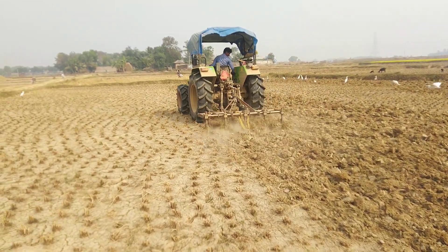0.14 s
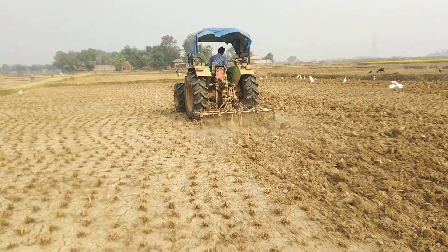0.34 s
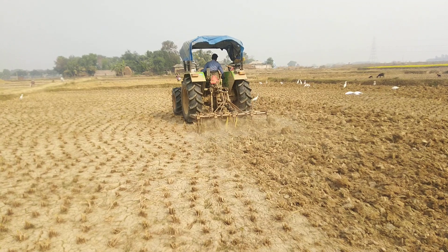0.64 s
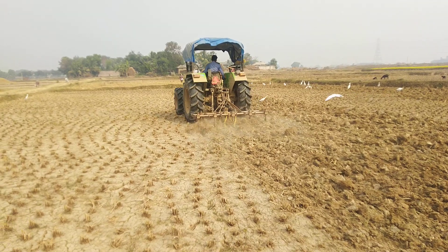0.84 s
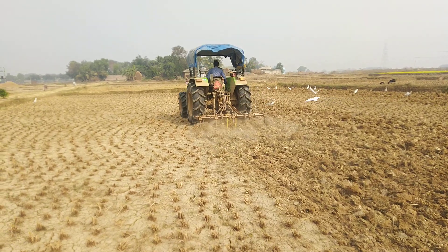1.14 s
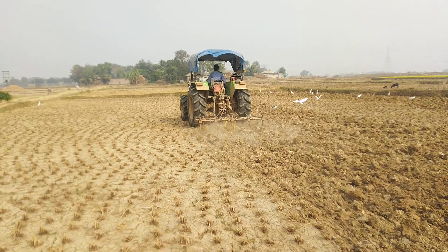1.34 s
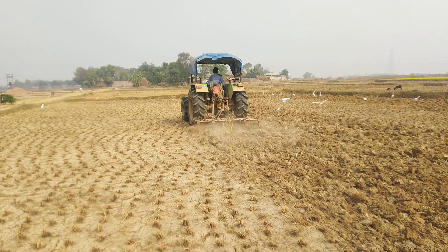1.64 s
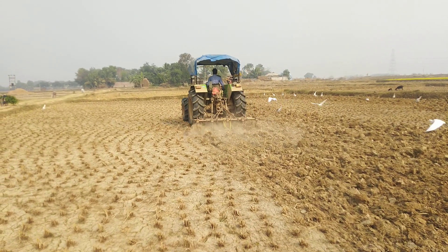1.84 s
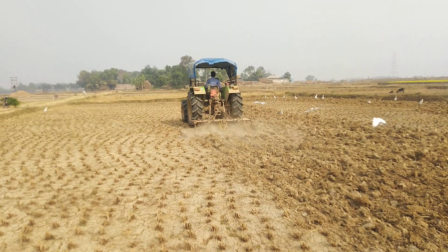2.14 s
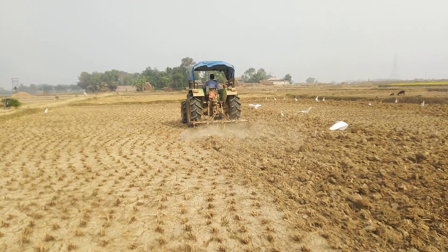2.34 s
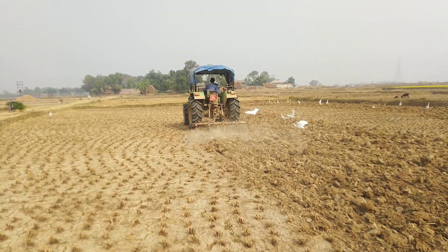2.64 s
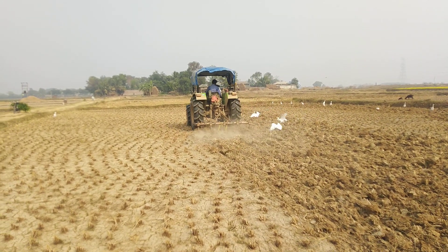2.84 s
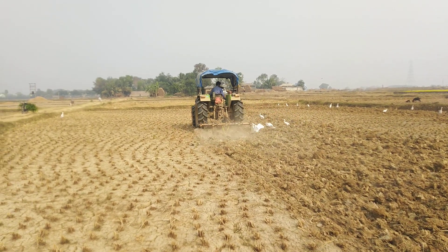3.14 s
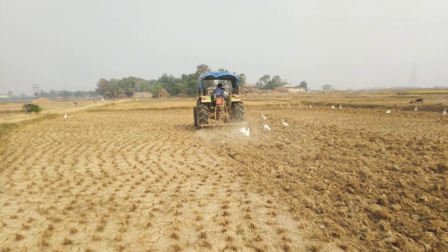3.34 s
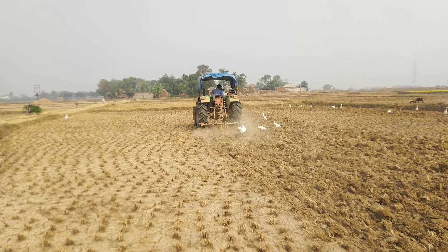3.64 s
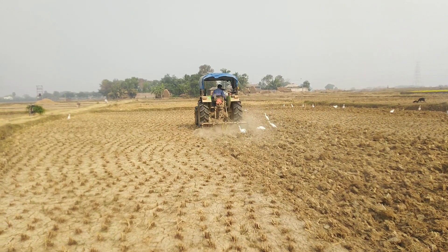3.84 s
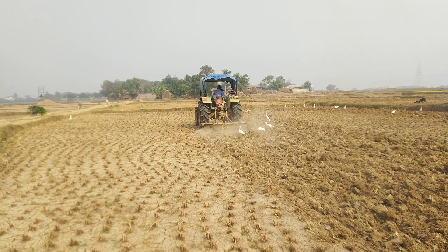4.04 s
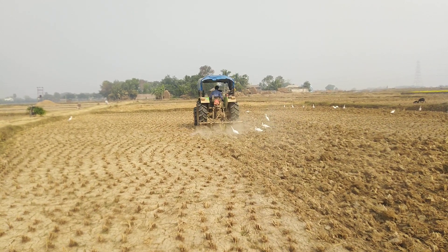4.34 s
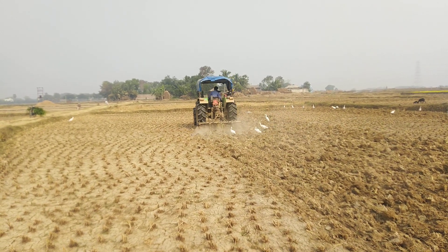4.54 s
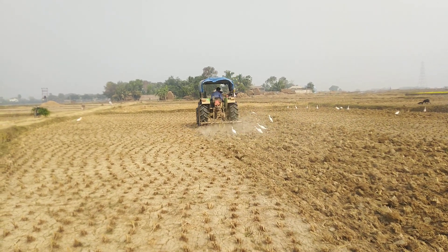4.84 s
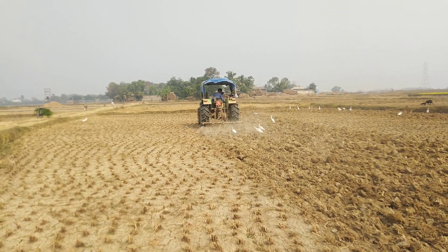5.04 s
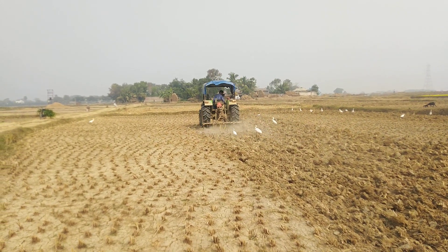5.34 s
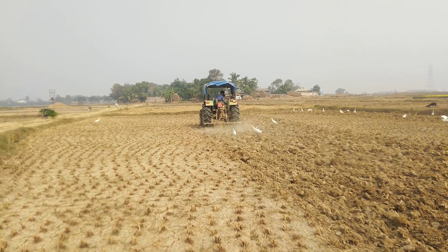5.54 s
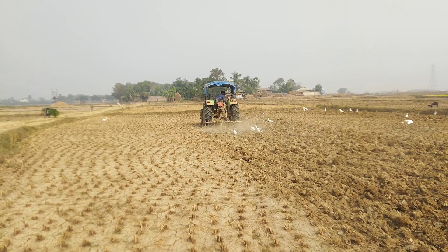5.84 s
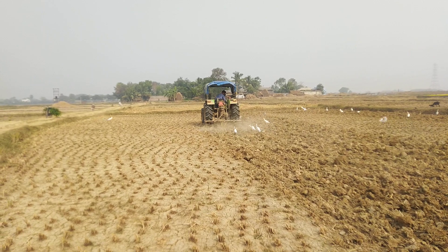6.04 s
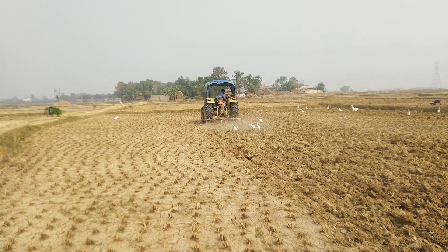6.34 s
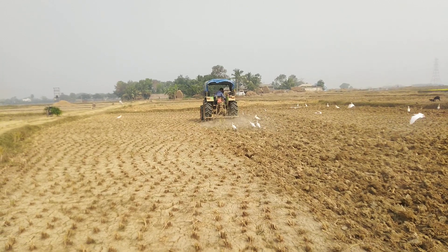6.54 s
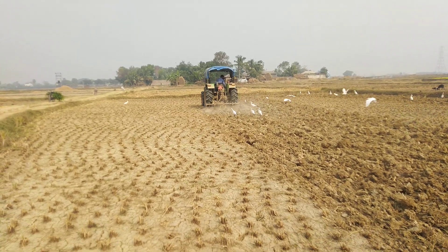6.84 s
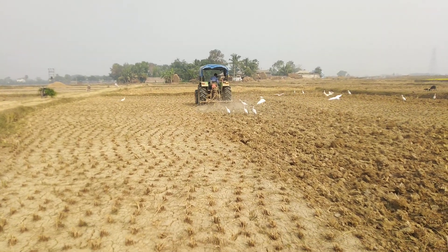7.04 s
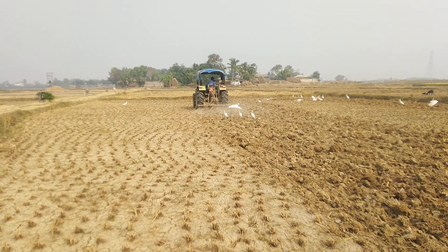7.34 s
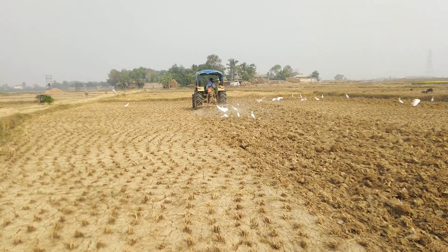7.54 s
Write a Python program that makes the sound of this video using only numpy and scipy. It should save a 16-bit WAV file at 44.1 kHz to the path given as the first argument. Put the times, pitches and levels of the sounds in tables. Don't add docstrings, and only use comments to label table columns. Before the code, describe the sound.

Rough wind thuds and crackles over a hand-held microphone as a knocking, whining tractor engine recedes under load, with small bird whistles and handling taps.

```python
import sys
import numpy as np
from scipy import signal
from scipy.fft import rfft, irfft
from scipy.io import wavfile
from scipy.ndimage import uniform_filter1d

SR = 44100
rng = np.random.default_rng(int(sys.argv[2]) if len(sys.argv) > 2 else 0)


def attenuation_scalar(level_db):
    decades = np.asarray(level_db, float) / 20
    return 10 ** decades


def to_wav(s):
    ch = np.atleast_2d(s).T
    pcm = np.round(np.clip(ch, -1, 1) * 32767)
    wavfile.write(sys.argv[1], SR, pcm.astype(np.int16))


N = 338688
T = np.arange(N) / SR


def curves(table):
    s, *columns = np.transpose(table)
    return [np.interp(T, s, column) for column in columns]


def unit(x):
    return x / np.sqrt(np.mean(x ** 2))


def noise():
    return rng.standard_normal(N)


def colour(x, points):
    hz, db = np.transpose(points)
    f = np.log(np.arange(N // 2 + 1) * SR / N + 1)
    return unit(irfft(rfft(x) * attenuation_scalar(np.interp(f, np.log(hz), db, -130, -130)), N))


def walk(rate):
    k = int(SR / rate)
    steps = np.repeat(rng.standard_normal(N // k + 1), k)
    return unit(uniform_filter1d(uniform_filter1d(steps, k), k)[:N])


def add(out, s, grain):
    i = int(s * SR)
    out[i:i + len(grain)] += grain[:N - i]


def distance_db():
    start_m, away_m_s = 11.65, 2.28
    return -20 * np.log10(1 + away_m_s * T / start_m)


# f/Hz, level/dB (per Hz)
AIR_SPECTRUM = [(6000, -5), (7300, -13.5), (8100, -18), (9200, -5), (11500, -3), (13200, -6.5),
                (14200, -14.5), (15200, -27)]


def air_hiss():
    def port():
        level_db = -64 + 1.08 * distance_db() + 0.8 * walk(12) + 2.0 * walk(40)
        return colour(noise(), AIR_SPECTRUM) * attenuation_scalar(level_db)
    return np.array([port() for _ in range(2)])


# f/Hz, level/dB
RIGHT_SHADE = [(1600, -0.5), (2050, 1), (2300, 3.5), (2700, 4), (3100, -3.5), (3500, 0.5), (3850, -13),
               (4100, -3.5), (4900, -9.5), (5500, 3.5), (6200, -6), (7000, 2.5)]


def shade(x):
    hz, db = np.transpose(RIGHT_SHADE)
    return irfft(rfft(x) * attenuation_scalar(np.interp(np.arange(N // 2 + 1) * SR / N, hz, db)), N)


CLATTER_DB = -40.5
# f/Hz, level/dB (per Hz)
CLATTER_SPECTRUM = [(1500, -5.5), (1900, -4), (2800, -4), (3600, -6), (4400, -9.5), (5600, -18),
                    (6500, -27), (8000, -39)]
# t/s, extra body echo delay/ms, right port level/dB, tinwork shading level/dB
TURN = [
    (0, 0.012, 1, -0.5),
    (1.3, 0.0058, 2.5, -1),
    (6.8, 0.0023, 1.5, 0),
    (7.0, 0.018, 1, -1.5),
    (7.68, 0.036, 0.5, -3),
]


def furrow_scatter():
    shade_db = curves(TURN)[2]
    loose = np.array([colour(noise(), CLATTER_SPECTRUM) for _ in range(2)])
    loose *= attenuation_scalar(CLATTER_DB - 9 + shade_db + distance_db())
    loose[1] = shade(loose[1])
    return loose


# t/s, length/s, buffeting level/dB, thud share level/dB
GUSTS = [(0.278, 0.076, -56, -5.2), (0.576, 0.044, -26, -16), (0.685, 0.006, -22, -5),
         (0.824, 0.13, -27.5, -1), (1.151, 0.067, -24.5, 0), (1.264, 0.08, -23, -9),
         (1.506, 0.04, -25.5, -8), (1.62, 0.22, -25.5, 0), (1.922, 0.065, -14.5, -28),
         (2.161, 0.0074, -23, -9), (2.246, 0.21, -33.5, -13), (2.697, 0.019, -19, -33),
         (2.804, 0.13, -23.5, -33), (2.962, 0.23, -20.5, -4.5), (3.552, 0.17, -18, -18),
         (3.832, 0.45, -20.5, -12), (4.3, 0.17, -34, -2), (4.56, 0.0087, -37, 6), (4.641, 0.007, -17.5, -9),
         (4.781, 0.017, -21.5, -5), (4.867, 0.37, -31.5, 0), (5.336, 0.1, -24.5, 0),
         (5.462, 0.27, -22.5, -5), (5.83, 0.3, -39.5, 7.5), (6.172, 0.025, -25, -9),
         (6.295, 0.12, -23.5, -3), (6.478, 0.1, -21, 0.5), (6.636, 0.098, -29.5, -17),
         (6.799, 0.21, -48, 11.5), (7.208, 0.078, -51, 24), (7.413, 0.2, -31.5, -4)]


def gusts():
    rise_s, fall_s, calm_db, calm_thud_db = 0.014, 0.028, -34, -6
    body = np.full(N, attenuation_scalar(calm_db))
    thud = np.full(N, attenuation_scalar(calm_db + calm_thud_db))
    for s, length, db, thud_db in GUSTS:
        before, after = np.clip(s - T, 0, None), np.clip(T - s - length, 0, None)
        shape = np.exp(-before / rise_s - after / fall_s)
        body += attenuation_scalar(db) * shape
        thud += attenuation_scalar(db + thud_db) * shape
    return body, thud


# t/s, peak level/dB, width/ms
SNAPS = [(0.6864, -8.5, 3.1), (0.9025, -13.5, 1.6), (1.173, -13, 3.5), (1.189, -9, 3.1),
         (1.203, -16.5, 3.3), (1.9593, -7.5, 3), (1.9746, -16, 2.4), (1.9921, -11.5, 1),
         (2.1662, -5.5, 3.3), (2.7303, -23, 2.5), (2.961, -14, 4.5), (3.004, -12, 4), (3.03, -6, 3.2),
         (3.046, -12, 2.6), (3.0685, -16, 4.7), (3.1054, -11.5, 2.2), (3.117, -9, 7.1),
         (3.1599, -13.5, 3.3), (3.1983, -11.5, 2), (3.5596, -8, 0.91), (3.5971, -5.5, 0.93),
         (3.6316, -7, 1.8), (3.66, -16, 1.9), (3.6784, -14, 2.5), (3.739, -4.5, 1.7), (3.8478, -8, 1.1),
         (3.8669, -8.5, 0.97), (3.9064, -10.5, 1.63), (3.9604, -9, 3.3), (3.971, -5, 6.7),
         (3.984, -12, 3.06), (4.013, -4.5, 2.8), (4.0545, -5.5, 1.9), (4.093, -11, 2), (4.1156, -14.5, 2.1),
         (4.1292, -15, 1.3), (4.1972, -7, 1.1), (4.249, -6.5, 1.2), (4.262, -13, 1.7), (4.5765, -11, 4.2),
         (4.773, -8, 6.7), (4.784, -20.5, 0.4), (4.9449, -10, 5.5), (5.347, -14, 6), (5.3907, -11, 4.3),
         (5.4084, -8.5, 3.3), (5.464, -14, 1.5), (5.5043, -17, 2.3), (5.5799, -9, 3.2), (5.637, -10, 2.4),
         (5.6782, -14, 1.5), (6.1938, -8, 4), (6.234, -12, 1.5), (6.3935, -15.5, 1.8), (6.5114, -5, 3.8),
         (6.551, -12.5, 2.3), (6.5756, -12.5, 1.3), (6.69, -11.5, 1.9), (6.7445, -14.5, 1.4),
         (7.502, -12.5, 1.7)]
# t/s, peak level/dB, width/ms
PUFFS = [(0.681, -15, 3), (3.156, -7.5, 4.3), (3.193, -14.5, 2), (3.579, -10, 2.1), (3.675, -13, 2),
         (3.698, -15, 1.9), (3.759, -14.5, 1.8), (3.89, -14.5, 1.9), (4.154, -12, 1.8), (4.2129, -7.5, 1.3),
         (4.231, -15, 2.2), (4.2904, -16.5, 1.6), (4.333, -14.5, 1), (4.6376, -17, 1.46), (4.663, -16, 2.7),
         (4.683, -16, 2.6), (5.342, -9.5, 4.6), (5.383, -12, 2.9), (5.475, -12.5, 2), (6.411, -11, 2.9),
         (6.526, -14, 3.1)]


def snaps():
    back_s, hush_s, hush = 0.0033, 0.0043, 0.7
    out, hushed = np.zeros(N), np.zeros(N)
    t = np.arange(-600, 6000) / SR
    for sign, table in (-1, SNAPS), (1, PUFFS):
        for s, db, ms in table:
            jump_s = 0.24 * ms / 1000
            jump = (1 + np.tanh(t / jump_s + 1.22)) / 2
            creep = np.exp(-np.clip(t, 0, 1) / back_s)
            add(out, s + t[0], sign * attenuation_scalar(db + 3.5) * jump * creep)
            add(hushed, s + t[0], np.exp(-(t / hush_s) ** 2))
    return out, 1 - np.clip(hush * hushed, 0, 1)


def eddies(rate, spread_db):
    kick = rng.random(N) < rate / SR
    return kick * noise() * attenuation_scalar(spread_db * noise())


# f/Hz, level/dB
THUD_SPECTRUM = [(20, -5.5), (52, -6.5), (72, -0.5), (90, -0.5), (130, -34.5)]
BODY_SPECTRUM = [(60, -25), (100, 4.5), (160, 0.5), (230, -7.5), (330, -23.5)]
EDGE_SPECTRUM = [(170, -8.5), (270, 0.5), (400, -6), (600, -14.5), (900, -24), (1500, -43.5)]
LEE_SPECTRUM = [(25, -8.5), (60, -1), (120, -16), (180, -5), (220, -20)]
# t/s, sharp edge share level/dB
EDGE_SHARE = [(0, -35), (.6, -30), (2.0, -21), (2.3, -12), (2.9, -17.5), (3.5, -10.5), (3.85, -3.5),
              (4.05, -11.5), (4.25, -5.5), (4.45, -16), (4.62, -13), (4.85, -27), (5.5, -15), (5.9, -30),
              (6.5, -9), (7.0, -18.5), (7.5, -12.5), (7.68, -3.5)]
# t/s, rumble level/dB
LEE = [(0.0, -38), (0.25, -30), (0.66, -35.5), (1.1, -31), (1.5, -36.5), (2.0, -33), (2.66, -32.5),
       (2.9, -41.5), (3.7, -35.5), (3.95, -40), (4.75, -37), (5.7, -45), (5.9, -36), (6.5, -48),
       (7.38, -37), (7.5, -36), (7.68, -36)]


def wind(gust, slow_gust):
    big, small = eddies(rate=700, spread_db=2), eddies(rate=600, spread_db=2.6)
    jumps, rest = snaps()
    thud = slow_gust * colour(big, THUD_SPECTRUM)
    body = attenuation_scalar(-3.0) * colour(unit(big) + 1.27 * unit(small), BODY_SPECTRUM)
    edge = attenuation_scalar(curves(EDGE_SHARE)[0] + 3.2 * walk(12)) * colour(small, EDGE_SPECTRUM)
    left_db = curves(LEE)[0] + 5.3 * walk(4.7)
    left = attenuation_scalar(left_db) * colour(eddies(rate=460, spread_db=2.5), LEE_SPECTRUM)
    return np.array([left, jumps + rest * (thud + gust * (body + edge))])


def wind_yield_db(gust):
    memory_s = 0.17
    loss_db_per_pressure = np.array([[-20], [-27]])
    return loss_db_per_pressure * uniform_filter1d(gust, int(memory_s * SR))


TAP_S = 1.2759


def tap_duck_db():
    quick_db, quick_s = np.array([[-20], [-10]]), np.array([[0.072], [0.042]])
    linger_db, linger_s = np.array([[-3.5], [-0.5]]), 0.32
    after = T - TAP_S
    quick = quick_db * np.exp(-np.clip(after - .015, 0, None) / quick_s)
    linger = linger_db * np.exp(-np.clip(after, 0, None) / linger_s)
    return (after > 0) * (quick + linger)


# t/s, ring f/Hz, ring T60/s, left level/dB, right level/dB
TICKS = [(1.2771, 2900, 0.0034, -40, -31), (1.2825, 3980, 0.0033, -50.5, -70),
         (4.558, 10700, 0.0023, -43, -54), (4.558, 5700, 0.0033, -42, -55),
         (6.7616, 4200, 0.0073, -35.5, -16), (6.7618, 6100, 0.0034, -48, -34),
         (6.762, 9650, 0.0018, -41.5, -31), (6.7618, 11800, 0.0025, -33, -28),
         (6.762, 13700, 0.003, -46, -32), (6.762, 2300, 0.0034, -42, -25), (6.7616, 3220, 0.004, -49, -22),
         (6.759, 1100, 0.008, -42, -20), (6.8712, 410, 0.0039, -50, -9), (6.8694, 4000, 0.002, -61, -39),
         (7.677, 10000, 0.0027, -40, -43)]


def handling():
    out, t = np.zeros((2, N)), np.arange(900) / SR
    for s, hz, t60, *db in TICKS:
        decay = np.exp(-np.log(1000) * t / t60)
        ring = (1 - np.exp(-t / .0001)) * decay * np.sin(2 * np.pi * hz * t)
        for side in range(2):
            add(out[side], s, -attenuation_scalar(db[side]) * ring)
    after = T - TAP_S
    out[0] += .85 * np.exp(-(after + .00004) ** 2 / .000026 ** 2)
    out[0] += .4 * np.exp(-(after + .00013) ** 2 / .00002 ** 2)
    out[0] -= 1.02 * np.clip(after / .00011, 0, 1) * np.exp(-np.clip(after, 0, 9) / .3)
    return out


# t/s, length/s, start f/Hz, end f/Hz, level/dB
CHIRPS = [
    (1.57, .04, 2900, 2600, -52),
    (1.80, .07, 2750, 3050, -51),
    (2.205, .1, 2600, 3700, -39),
    (2.528, .032, 3050, 4350, -42),
    (2.59, .03, 3200, 3950, -55),
    (3.032, .065, 2650, 3500, -44),
    (1.04, .1, 6750, 6750, -66),
    (4.31, .07, 6750, 6750, -72),
    (7.43, .05, 4200, 4600, -53),
]
HOOKS = [
    (3.612, .04, 2850, 3520, -42),
]


def bird():
    out, flutter = np.zeros(N), walk(160)
    for calls, late in (CHIRPS, True), (HOOKS, False):
        for s, length, from_hz, to_hz, db in calls:
            u = np.linspace(0, 1, int(length * SR))
            climb = .5 * u + .5 * u ** 6 if late else u ** .35
            hz = from_hz + (to_hz - from_hz) * climb
            swell = np.sin(np.pi * u ** 1.2) ** .6
            tone = np.sin(2 * np.pi * np.cumsum(hz) / SR)
            add(out, s, attenuation_scalar(db + 1.5 * flutter[:len(u)]) * swell * tone)
    return out * attenuation_scalar(np.array([[-1], [-17]]))


# t/s, whine level/dB
GEAR_PULL = [(0.25, -44), (0.4, -34), (1.0, -35.5), (1.9, -39), (2.07, -33), (2.25, -39), (2.6, -34.5),
             (3.03, -37), (3.35, -32.5), (3.8, -36.5), (4.45, -35), (5.1, -38), (5.5, -39.5), (5.75, -36.5),
             (5.95, -44), (6.35, -35.5), (6.8, -42), (7.68, -38.5)]
# t/s, length/s, level change/dB
SLACK = [
    (0.724, 0.031, -18),
    (1, 0.065, -6),
    (1.37, 0.016, -18),
    (2.1, 0.13, -8),
    (5.554, 0.15, -8.5),
    (5.983, 0.16, -11),
    (6.546, 0.11, -12.5),
    (7.067, 0.28, -13),
]


def gear(firing_hz):
    teeth_per_firing = 22.38
    rough = .0025 + .017 * np.exp(-(T / 1.0) ** 2)
    turn = 2 * np.pi * np.cumsum(teeth_per_firing * firing_hz * (1 + rough * walk(40))) / SR
    slack_db = sum(db * np.exp(-((T - s) / length * 2 - 1) ** 4) for s, length, db in SLACK)
    whine_db = curves(GEAR_PULL)[0] + slack_db + 2.08 * walk(25) + 0.63 * walk(11)
    octave_db = -42.5 + 1.07 * distance_db() + slack_db / 2 + 4.6 * walk(7)
    whine = attenuation_scalar(whine_db) * np.sin(turn)
    octave = attenuation_scalar(octave_db) * np.sin(2 * turn + 1.37 * walk(60))
    slower = attenuation_scalar(-58.0 + 2.0 * walk(3.8)) * np.sin(0.28 * turn)
    return whine + octave + slower


# t/s, peak level/dB
SINGLE_KNOCKS = [(0.1203, -27), (0.209, -27), (0.299, -25.5), (0.3868, -23.5), (0.4745, -31), (0.559, -29),
                 (0.6495, -28), (0.739, -28), (0.832, -32), (1.109, -25.5), (1.201, -26), (1.386, -28),
                 (1.476, -24), (1.7493, -30), (1.8434, -29.5), (1.938, -22.5), (2.12, -44), (2.2085, -23),
                 (2.298, -26), (2.4735, -37), (2.564, -22), (2.6449, -35), (2.743, -33), (2.834, -25),
                 (3.2864, -29.5), (3.375, -44), (3.5548, -27), (3.6451, -28.5), (3.921, -26), (4.104, -27.5),
                 (4.1942, -27.5), (4.286, -28.5), (4.377, -28.5), (4.649, -25.5), (4.738, -28),
                 (4.828, -28.5), (5.008, -26.5), (5.098, -32), (5.1887, -32.5), (5.2827, -37), (5.463, -41),
                 (5.556, -27.5), (5.731, -30), (5.856, -40), (6.029, -27), (6.0926, -32), (6.155, -36),
                 (6.279, -34), (6.371, -29), (6.462, -32), (6.671, -34), (6.7257, -38), (6.819, -41),
                 (6.9927, -32.5), (7.092, -39), (7.18, -33), (7.303, -38), (7.3712, -28.5), (7.4626, -33)]


def knocks(phase):
    ring_hz, sag_hz_per_s, rise_s, fall_s = 1295, 35000, .001, .0027
    out, t = np.zeros(N), np.arange(500) / SR - .004
    shape = np.exp(-(t / np.where(t < 0, rise_s, fall_s)) ** 2)
    cycle_s = np.interp(np.arange(0, phase[-1], 3), phase, T)
    chance = rng.standard_normal((len(cycle_s), 2))
    hard_s, hard_db = np.transpose(SINGLE_KNOCKS)
    soft = np.min(abs(hard_s[:, None] - cycle_s), axis=0) > .03
    soft_db = -38.5 + np.interp(cycle_s, T, distance_db()) + chance[:, 0]
    for s, db in zip(np.r_[cycle_s[soft], hard_s], np.r_[soft_db[soft], hard_db]):
        pitch = chance[np.argmin(abs(cycle_s - s)), 1]
        hz = ring_hz + 45 * pitch - sag_hz_per_s * t
        add(out, s - .0032, attenuation_scalar(db + 2.8) * shape * np.sin(2 * np.pi * np.cumsum(hz) / SR))
    return out


# multiple of the firing rate, level/dB
EXHAUST = [
    (1, -10),
    (2, -2),
    (8 / 3, -10),
    (3, -3),
    (10 / 3, -11),
    (4, -3),
    (5, -6),
    (16 / 3, -9),
    (6, -12),
    (7, -20),
]


def exhaust(phase):
    lines = np.zeros(N)
    for k, db in EXHAUST:
        lines += attenuation_scalar(db + 3.9 * walk(7)) * np.sin(2 * np.pi * k * phase + .5 * walk(5))
    return attenuation_scalar(-42.5 + .2 * (distance_db() + 4.5)) * lines


def drone():
    spectrum = [(520, -19), (600, -11.5), (700, 0.0), (860, -3.0), (960, -4.5)]
    return attenuation_scalar(-37.5 + 1.15 * distance_db() + 1.8 * walk(3.4)) * colour(noise(), spectrum)


# f/Hz, level/dB (per Hz)
BLOCK_SPECTRUM = [(190, -10.5), (230, -3), (330, -4), (480, -13.5), (600, -6), (780, -1), (930, -3.5),
                  (1050, -9.5), (1200, -1.5), (1550, -3), (1750, -16), (2000, -44)]
# t/s, level/dB
PANEL = [
    (0, -14),
    (6.8, -14.5),
    (7.0, -6),
    (7.68, -2.5),
]
# f/Hz, level/dB (per Hz)
PANEL_SPECTRUM = [(1720, -13.5), (1850, 1.5), (1980, -2.5), (2100, -14)]


def engine(phase):
    shot = np.floor(phase).astype(int) + 9
    chance = np.clip(rng.standard_normal((shot.max() + 1, 2)), -2, 1.6)[shot]
    cylinder_db = np.array([0, -3, -2])[shot % 3]
    burst = np.exp(-(phase % 1) / .18)
    block_gate = 1 + burst * attenuation_scalar(cylinder_db + 2.5 * chance[:, 0])
    block = colour(block_gate * noise(), BLOCK_SPECTRUM)
    tin_gate = (1 + 0.59 * burst * attenuation_scalar(7.0 * chance[:, 1])) * attenuation_scalar(0.37 * walk(14))
    tin = colour(tin_gate * noise(), CLATTER_SPECTRUM)
    tin = tin + path(tin, 2.177, -24, 4700)
    tin = tin + attenuation_scalar(curves(PANEL)[0]) * colour((1 + burst) * noise(), PANEL_SPECTRUM)
    shade_db = curves(TURN)[2]
    return attenuation_scalar(CLATTER_DB + distance_db() - 3.0) * (attenuation_scalar(shade_db) * tin + attenuation_scalar(9.0) * block)


def path(x, ms, db, dull_hz, bend_hz=np.inf):
    f = np.arange(N // 2 + 1) * SR / N
    over = (f / bend_hz) ** 3
    turn = np.pi * over / (1 + over) - 2 * np.pi * f * ms / 1000
    return irfft(rfft(x) * attenuation_scalar(db) * np.exp(1j * turn) / (1 + 1j * f / dull_hz), N)


# lag/ms, level/dB, dull above f/Hz, bend f/Hz
PORTS = [
    [(.14, 2, 16000), (1.66, -3.5, 9000, 2000)],
    [(0, 2.5, 1600), (.49, -9, 5000)],
]


def at_ports(far):
    echo_ms, right_db, _ = curves(TURN)
    ports = np.zeros((2, N))
    for side, (direct, echo) in enumerate(PORTS):
        late = np.interp(T - echo_ms / 1000, T, path(far, *echo))
        ports[side] = path(far, *direct) + late
    ports[1] = shade(ports[1]) * attenuation_scalar(right_db)
    return ports


# t/s, firing rate f/Hz
FIRING = [(0.33, 34.4), (0.56, 34.2), (0.8, 32.6), (1.42, 32.95), (1.93, 32.15), (2.27, 34.24),
          (2.95, 32.65), (3.24, 33.85), (3.89, 32.46), (4.2, 33.36), (4.42, 32.5), (4.63, 33.54),
          (5.5, 32.69), (5.71, 34.8), (6.11, 31.8), (6.72, 34.6), (7.13, 32.07), (7.68, 32.76)]


def tractor():
    firing_hz = curves(FIRING)[0]
    phase = np.cumsum(firing_hz) / SR - 4.37
    far = gear(firing_hz) + knocks(phase) + exhaust(phase) + drone() + engine(phase)
    return at_ports(far)


def scene():
    gust, slow_gust = gusts()
    duck_db = tap_duck_db()
    field = air_hiss() * attenuation_scalar(.1 * duck_db) + furrow_scatter() + bird() + tractor()
    return (field * attenuation_scalar(wind_yield_db(gust)) + wind(gust, slow_gust)) * attenuation_scalar(duck_db) + handling()


def roll_off(x):
    return signal.sosfilt(signal.butter(12, 16870, fs=SR, output="sos"), x)


def record(dry):
    cut = signal.cheby1(4, .8, 52, "high", fs=SR, output="sos")
    mix = signal.sosfilt(cut, dry)
    return roll_off(mix)


dry = scene()
out = record(dry)
to_wav(out)
```